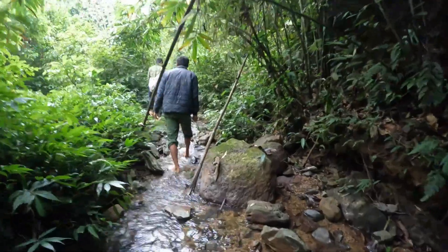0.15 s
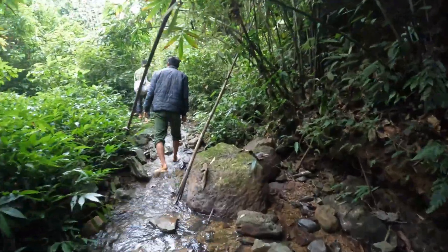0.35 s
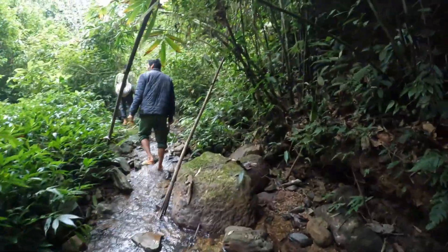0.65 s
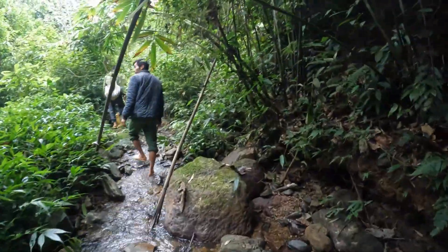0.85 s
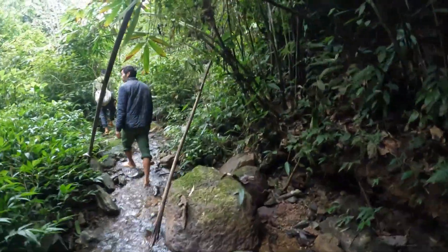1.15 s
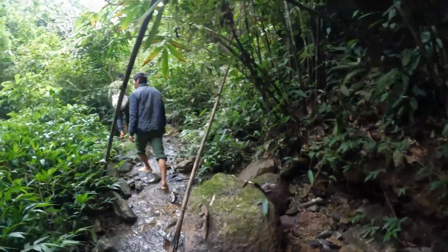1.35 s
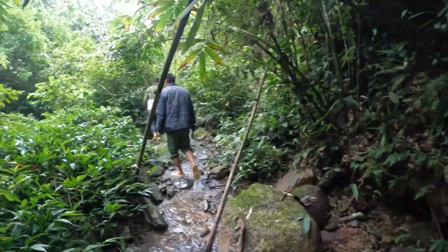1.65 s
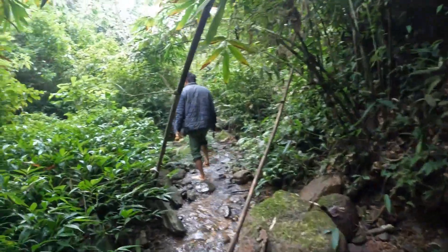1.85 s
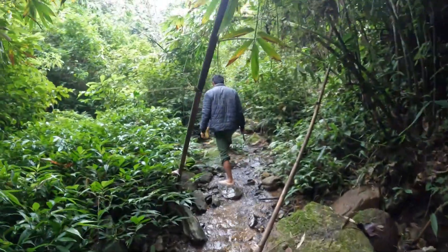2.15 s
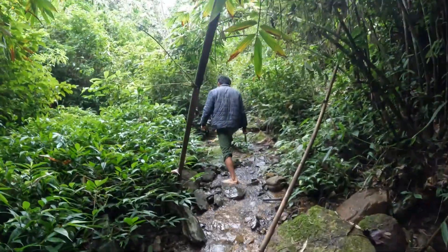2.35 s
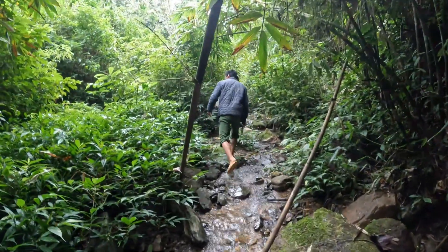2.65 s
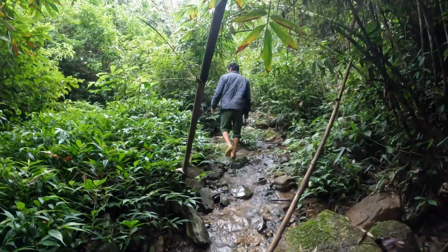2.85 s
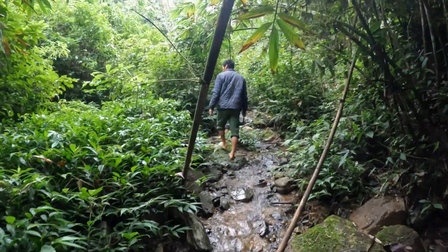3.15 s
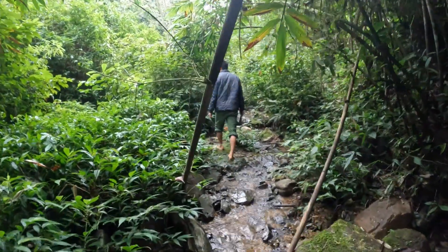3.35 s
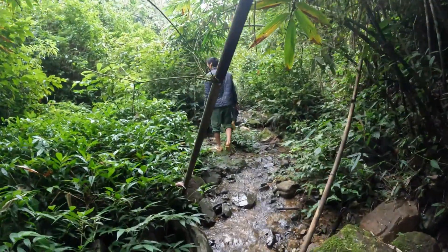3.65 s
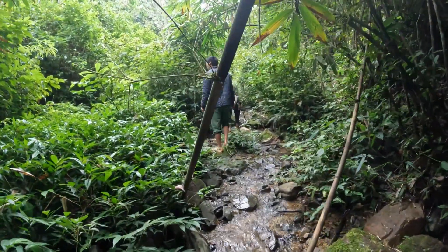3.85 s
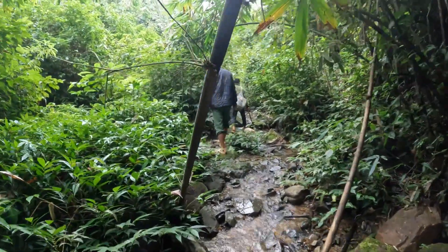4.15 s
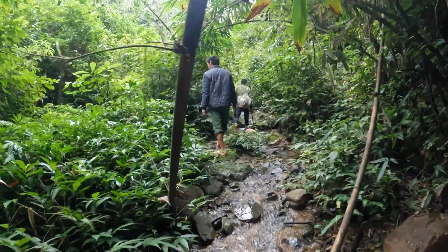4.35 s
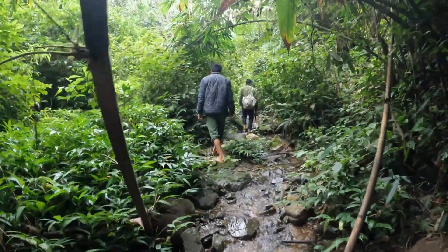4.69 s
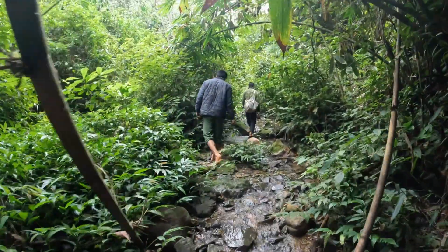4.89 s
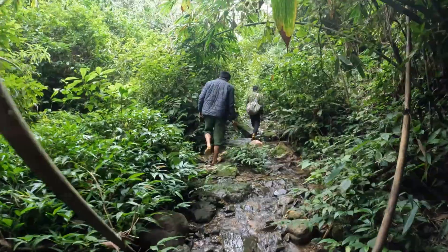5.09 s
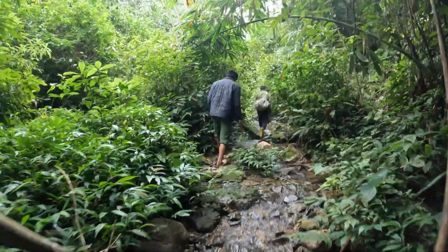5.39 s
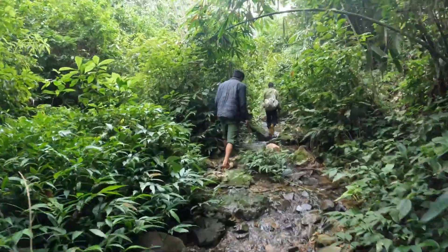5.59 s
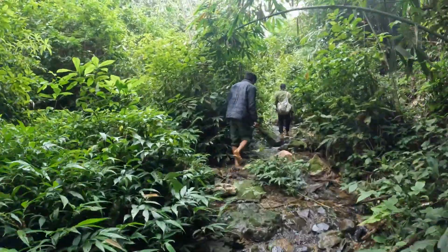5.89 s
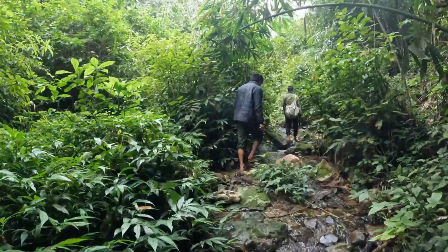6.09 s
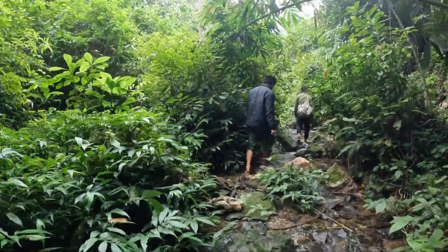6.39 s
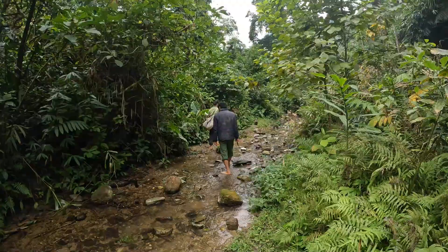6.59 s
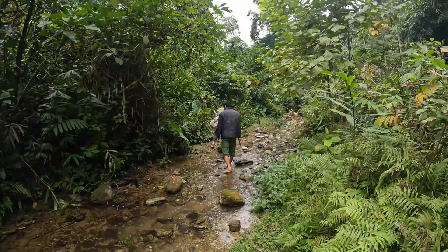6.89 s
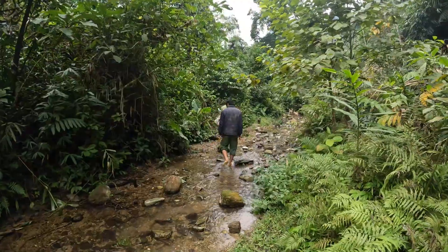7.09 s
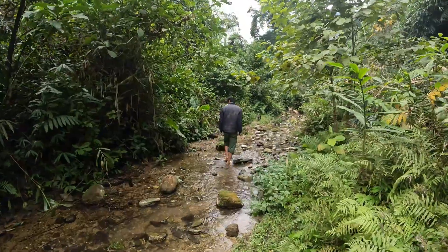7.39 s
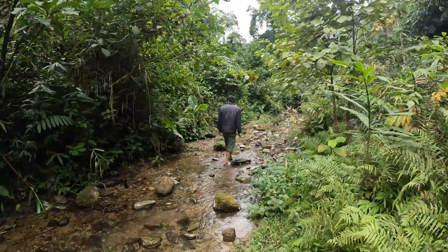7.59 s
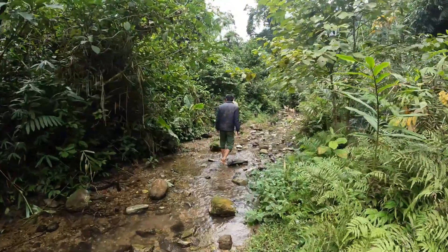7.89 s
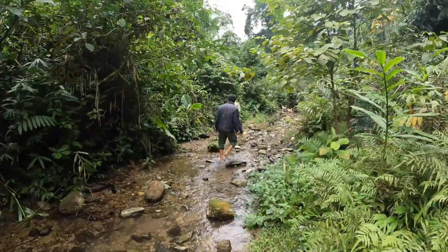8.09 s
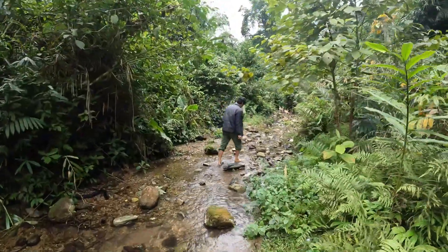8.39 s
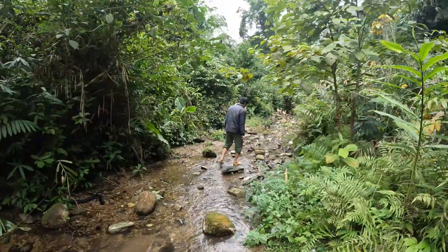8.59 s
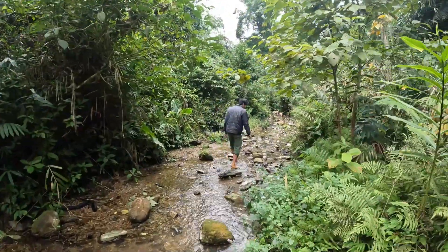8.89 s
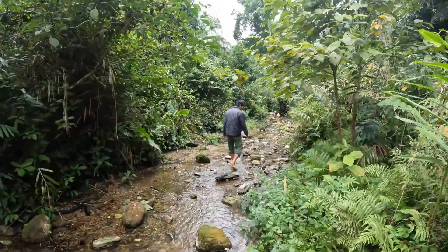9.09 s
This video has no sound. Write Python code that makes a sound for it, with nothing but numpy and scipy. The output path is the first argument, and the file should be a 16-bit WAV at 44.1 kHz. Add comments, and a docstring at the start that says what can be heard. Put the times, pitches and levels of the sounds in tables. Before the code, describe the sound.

A shallow forest stream babbles and gurgles close by from the start, with feet wading through it in irregular splashes. Bubbles plop, and twigs and pebbles give short, sharp snaps, clearest right at the beginning and near 1, 1.9 and 4.3 seconds. The hand-held microphone adds a low, swaying rumble, with dull bumps around 3.5 and 4.5 seconds. Heavier splashes, plops, snaps and jolts cluster at about 5.5 seconds and again near 6.4 seconds. At roughly 6.6 seconds everything cuts off abruptly, and a much quieter, nearly mono stretch of stream quickly fades in. This faint, distant trickle carries a few soft wading splashes and small plops, the most noticeable around 8.4 seconds, and continues until the end just after 9 seconds.

```python
"""A shallow forest stream babbles and sprays round wading feet: small air bubbles resonate over the
broadband rush of turbulence, and each step throws up a splash. Big bubbles plop, twigs and pebbles snap,
and the hand-held camera that follows the walkers rumbles as it sways and jolts. After a hard cut a second,
much quieter and nearly mono stretch of the stream fades in."""
import sys
import numpy as np
from scipy import signal
from scipy.fft import rfft, irfft, next_fast_len
from scipy.io import wavfile
from scipy.ndimage import uniform_filter1d, map_coordinates

SR = 44100
rng = np.random.default_rng(int(sys.argv[2]) if len(sys.argv) > 2 else 0)


def pcm_store(signal):
    """Save signal as 16-bit PCM."""
    levels = np.round(np.clip(np.atleast_2d(signal), -1, 1) * 32767)
    wavfile.write(sys.argv[1], SR, levels.astype(np.int16).T)


N = 407484
CUT_S = 6.564  # the close stretch ends here


def amp(db):
    return 10 ** (np.asarray(db) / 20)

def unit(x):
    return x / np.sqrt(np.mean(x ** 2) + 1e-20)

def along(points, hz):
    """Interpolation of (frequency, value) points on a logarithmic frequency axis."""
    knots_hz, values = np.transpose(points)
    return np.interp(np.log(hz + 1), np.log(knots_hz + 1), values)

def curves(rows):
    """Linear interpolation in time: one value per sample for each column after the first."""
    times, *columns = np.transpose(rows)
    return [np.interp(np.arange(N) / SR, times, column) for column in columns]

def wobble(rate):
    """Random modulation: a smooth curve with `rate` knots a second."""
    return map_coordinates(rng.standard_normal(int(N * rate / SR) + 4), [np.arange(N) * rate / SR])

def filtered(x, response):
    """Zero-phase filtering: the spectrum of x times a function of frequency."""
    size = next_fast_len(N + SR // 4)
    return irfft(rfft(x, size) * response(np.fft.rfftfreq(size, 1 / SR)), size)[..., :N]

def panned(db):
    """Level-difference panning: the two gains that put left db above right."""
    return amp([np.asarray(db) / 2, -np.asarray(db) / 2])

def add_at(out, start_s, sound):
    """Superposition: adds a multichannel sound to out from start_s on."""
    span = out[:, round(start_s * SR):][:, :sound.shape[1]]
    span += sound[:, :span.shape[1]]


def turbulence(patchy_db):
    """Turbulent rush: two independent noises whose gain varies in small patches of time and frequency."""
    spectra = signal.stft(rng.standard_normal((2, N), dtype=np.float32), nperseg=256)[2]
    patches = uniform_filter1d(rng.standard_normal(spectra.shape[1:]), size=4, axis=0)
    patches = uniform_filter1d(patches, size=10, axis=1)
    return unit(signal.istft(spectra * amp(patchy_db * unit(patches)), nperseg=256)[1][:, :N])


def bubbles(count, low_hz, high_hz, cycles, spread_db, samples):
    """Bubble resonance: each small air pocket rings as a damped sine that rises in pitch."""
    when, pitch, life = rng.random((count, 3)).T[:, :, None]
    hz = low_hz * (high_hz / low_hz) ** pitch
    turns = np.arange(samples, dtype=np.float32) / SR * hz.astype(np.float32)
    age = turns / (cycles * (0.25 + 1.2 * life)).astype(np.float32)  # in lifetimes
    strength = hz * amp(spread_db * rng.standard_normal((count, 1)))
    ring = strength * age * np.exp(-5 * age) * np.sin(2 * np.pi * turns * (1 + 0.11 * age))
    positions = (when * N).astype(int) + np.arange(samples)
    return unit(np.bincount(positions.ravel(), ring.ravel(), N + samples)[:N])


def bank_scatter(x, wet_db, t60_s):
    """Scattering by banks and leaves, as mid and side: the response changes as the camera walks on."""
    step, t = SR // 4, np.arange(SR // 4) / SR
    pieces = np.pad(x, (0, -N % step)).reshape(-1, step)
    response = rng.standard_normal((2, len(pieces), step)) * amp(-60 * t / t60_s)
    response *= amp([[[wet_db]], [[0]]]) / np.linalg.norm(response[0], axis=-1).mean()
    response[0, :, 0] += 1  # the direct sound
    wash = np.pad(signal.fftconvolve(pieces[None], response, axes=2), ((0, 0), (0, 0), (0, 1)))
    wash[:, 1:, :step] += wash[:, :-1, step:]  # each piece rings on into the next
    return wash[:, :, :step].reshape(2, -1)[:, :N]


def water_layers():
    """Smaller bubbles resonate higher: three populations give gurgle, babble and spray over one rush."""
    rush = turbulence(patchy_db=3.0)
    gurgle = bubbles(count=900, low_hz=225.6, high_hz=892, cycles=5.6, spread_db=5.0, samples=1500)
    babble = bubbles(count=5500, low_hz=634, high_hz=4975, cycles=10.5, spread_db=4.2, samples=480)
    spray = bubbles(count=8000, low_hz=3880, high_hz=13100, cycles=4.8, spread_db=6.5, samples=64)
    # (low edge [Hz], high edge [Hz], bubble share of the power at clarity 1, bubbles)
    bands = [(105, 520, 0.13, gurgle), (776, 7300, 0.38, babble), (4610, 11900, 0.4, spray)]
    return [(low_hz, high_hz, share, rush, unit(bank_scatter(pops, wet_db=-2.3, t60_s=0.18)))
            for low_hz, high_hz, share, pops in bands]


def stream(layers, splashes, flow, spectrum, width, spray_db, clarity):
    """Incoherent sources add in power: flow plus splashes. Low clarity blends bubbles into the rush."""
    babble_db, gurgle_db = curves(flow)
    levels_db = gurgle_db, babble_db, babble_db + spray_db
    surge = wobble(14)  # ripples swell all layers together
    out = np.zeros((2, N))
    for (low_hz, high_hz, share, rush, pops), db, splash_power in zip(layers, levels_db, splashes):
        water = np.sqrt(1 - share * clarity) * rush + np.sqrt(share * clarity) * pops
        band = lambda hz: 1 / np.sqrt((1 + (low_hz / (hz + 1)) ** 8) * (1 + (hz / high_hz) ** 8))
        colour = lambda hz: amp(along(spectrum, hz) + [0 * hz, along(width, hz)])
        mid, side = filtered(water, lambda hz: band(hz) * colour(hz))
        flow_power = amp(db + 0.29 * surge + 0.56 * wobble(35)) ** 2
        out += np.sqrt(flow_power + splash_power) / np.std(mid) * np.array([mid + side, mid - side])
    return out


# Steady flow close by: (time [s], babble level [dB], gurgle level [dB])
CLOSE_FLOW = [(0.0, -41.5, -51), (0.54, -44, -57), (1.12, -44.5, -53.5), (1.45, -46, -56.5),
              (1.86, -42, -52.5), (2.1, -51, -53), (2.35, -47, -55.5), (2.9, -41.5, -47.5),
              (3.17, -41.5, -60.5), (3.48, -46, -50.5), (3.95, -42, -59), (4.49, -43.5, -49),
              (5.16, -41, -56.5), (5.92, -38.5, -43.5), (6.41, -38, -50), (6.5, -64.5, -58)]
# Its spectral envelope: (frequency [Hz], relative level [dB])
CLOSE_SPECTRUM = [(60, -38), (100, -6), (223, 0), (439, -6.5), (642, 6), (863, 0.5), (1290, 5.5),
                  (2380, -1), (3410, -3.5), (5090, -16.5), (7500, -18), (8300, -25), (12400, -25),
                  (13700, -24.5), (15600, -42.5)]
# Its stereo width: (frequency [Hz], side over mid [dB])
CLOSE_WIDTH = [(100, -11), (300, -12.5), (1000, -9.5), (4000, -6), (8000, -6), (15000, -1.5)]
# Its balance at the microphone ports: (frequency [Hz], left over right [dB])
CLOSE_BALANCE = [(100, -8), (300, 1), (3000, 1), (8000, 2), (15000, 6.5)]

def close_stream(layers, splashes):
    """At short range single bubble resonances stand out, and the level differs between the two ports."""
    water = stream(layers, splashes, CLOSE_FLOW, CLOSE_SPECTRUM, CLOSE_WIDTH, spray_db=-7.5, clarity=0.79)
    return filtered(water, lambda hz: panned(along(CLOSE_BALANCE, hz)))


# Rumble of the swaying camera, one list per stretch: (time [s], level [dB])
SWAY_LEVELS = [
    [(0.0, -47), (0.98, -45.5), (1.08, -32.5), (1.5, -50), (2.15, -37.5), (3.29, -55.5), (3.44, -34),
     (3.93, -44), (4.49, -27.5), (4.92, -46), (5.63, -27.5), (6.26, -38), (6.5, -25)],
    [(6.65, -59), (7.1, -68), (8.26, -69), (8.42, -49), (8.6, -70), (9.24, -69)],
]
# Its spectral envelope in the close and the distant stretch: (frequency [Hz], relative level [dB])
CLOSE_RUMBLE = [(2, -24), (4, 8.5), (16, 0), (30, -14), (60, -30), (120, -46.5), (300, -120)]
DISTANT_RUMBLE = [(2, -36), (5, 9), (30, 2), (60, -6.5), (110, -57), (300, -120)]

def camera_sway(levels, spectrum, side_gain):
    """Slow pressure fluctuations on the ports of the moving camera give a partly coherent rumble."""
    mid, side = filtered(rng.standard_normal((2, N)), lambda hz: amp(along(spectrum, hz)))
    return amp(curves(levels)[0]) * np.array([mid + side_gain * side, mid - side_gain * side]) / np.std(mid)


# Feet throwing water: (time [s], babble level [dB], spray over babble [dB], 60 dB decay time [s])
FOOT_SPLASHES = [(0.001, -32, -5, 0.5), (0.023, -25.5, -11, 0.25), (0.233, -34, -6, 0.36),
                 (0.56, -39.5, -8.5, 1), (0.767, -33.5, 2.5, 0.35), (0.892, -39.5, -2.5, 0.96),
                 (1.232, -35.5, -8, 0.31), (1.665, -34, -15, 0.18), (1.787, -41.5, -6, 1),
                 (1.891, -35, -0.5, 0.29), (2.034, -41.5, 0, 0.49), (2.625, -41.5, 5, 0.26),
                 (2.96, -39, -20, 1), (3.31, -36, 8, 0.05), (3.673, -36, -13, 0.53), (3.874, -37, -10, 0.4),
                 (4.238, -34.5, -3.5, 0.15), (4.297, -28, -1, 0.17), (4.712, -39.5, -10, 0.42),
                 (4.77, -40, -28, 1), (5.119, -35, -19, 0.13), (5.272, -41, -5, 0.4), (5.455, -37, 5, 0.22),
                 (5.522, -21.5, 3, 0.088), (5.56, -24.5, -10, 0.23), (5.62, -35.5, -1.5, 0.65),
                 (5.824, -33, -1, 0.22), (6.014, -38, -9, 0.73), (6.122, -31, -20, 0.11),
                 (6.319, -49, 2.5, 0.36), (6.4, -28.5, -8.5, 0.6), (6.445, -27.5, -1.5, 0.3),
                 (6.479, -27, -11, 0.47), (6.799, -54, -13, 0.59), (6.855, -46.5, -27, 0.42),
                 (6.997, -47, -17, 0.2), (7.475, -57, -2, 0.99), (7.61, -50.5, -0.5, 0.22),
                 (7.83, -58.5, -3, 0.56), (7.949, -50.5, -25, 0.3), (8.097, -59.5, -1.5, 0.6),
                 (8.34, -47, -8, 0.34), (8.37, -40, -11.5, 0.35), (8.681, -49, -28, 0.19),
                 (8.972, -52.5, -1, 0.38), (9.072, -46, -10, 0.36), (9.186, -50, -19, 0.29)]

def wading():
    """Impulsive excitation: each splash adds power to the three water layers, then decays exponentially."""
    power, t = np.zeros((3, N)), np.arange(SR // 2) / SR
    for start_s, db, spray_db, t60_s in FOOT_SPLASHES:
        # distant splashes swell in more slowly, with slightly more gurgle
        gurgle_db, rise_s = (-12.5, 0.0044) if start_s < CUT_S else (-11.5, 0.012)
        envelope = amp(db - 60 * t / t60_s) * (1 - np.exp(-t / rise_s))
        add_at(power, start_s, (amp([[gurgle_db], [0], [spray_db]]) * envelope) ** 2)
    return power


# Large bubbles and drops: (time [s], level [dB], nominal frequency [Hz])
BIG_BUBBLES = [(0.022, -22, 1627), (0.036, -14.5, 1702), (0.044, -21.5, 1946), (0.085, -25, 300),
               (0.091, -21, 1393), (0.25, -22, 857), (0.268, -26, 980), (0.444, -31, 990), (0.56, -27, 910),
               (0.594, -27.5, 942), (0.773, -21.5, 425), (1.323, -26.5, 492), (1.336, -24, 500),
               (1.66, -28, 1500), (1.785, -19, 1464), (1.805, -26, 1365), (1.888, -22, 2094),
               (2.034, -26, 1524), (2.459, -31, 716), (2.521, -30, 1325), (2.965, -29, 414),
               (3.056, -23.5, 1046), (3.088, -30, 560), (3.1, -26.5, 640), (3.185, -31.5, 640),
               (3.697, -25, 1180), (3.895, -28, 3200), (3.907, -25, 1710), (4.268, -29, 650),
               (4.36, -25, 1530), (5.117, -23, 3780), (5.151, -29, 1204), (5.269, -30, 3080),
               (5.522, -19, 2960), (5.525, -22.5, 330), (5.572, -22.5, 380), (5.56, -20.5, 1100),
               (5.71, -23, 975), (5.787, -27, 1088), (5.818, -17, 297), (5.906, -23.5, 290),
               (5.916, -25.5, 1124), (6.306, -25.5, 716), (6.345, -30, 700), (6.375, -28, 720),
               (6.437, -16.5, 195.6), (6.482, -19, 290), (6.491, -18.5, 1074), (6.497, -20, 320),
               (6.515, -18, 718), (6.519, -17, 1137), (7.147, -46, 1224), (7.956, -38, 1130),
               (8.096, -38, 1330), (8.357, -40, 220), (8.39, -34, 1150), (8.555, -44.5, 1256),
               (8.69, -47, 620), (8.794, -40, 2800), (9.07, -40, 2120), (9.185, -39, 2910),
               (9.197, -39, 1210)]

def plops(t60_s=0.049, rise_s=0.0032, close_left_db=2.5):
    """A bubble's resonance climbs as it nears the surface; water bursting round it roughens the ring."""
    out, t = np.zeros((2, N)), np.arange(SR // 6) / SR
    for start_s, db, hz in BIG_BUBBLES:
        phase = 2 * np.pi * hz * t * (0.95 + 0.13 * t / t60_s)
        roughness = 1 + 0.63 * unit(uniform_filter1d(rng.standard_normal(len(t)), 1 + int(2 * SR / hz)))
        envelope = amp(db - 60 * t / t60_s) * (1 - np.exp(-t / rise_s))
        gains = panned(close_left_db * (start_s < CUT_S))[:, None]
        add_at(out, start_s, gains * envelope * roughness * np.sin(phase))
    return out


# Twigs and pebbles: (time [s], peak level [dB], centre frequency [Hz], left over right [dB])
TWIG_SNAPS = [(0.0841, -13.5, 3360, 1.5), (0.0917, -16, 3210, 1.5), (0.153, -22, 3600, 2.0),
              (0.1755, -26, 2840, 1.5), (0.9704, -11.5, 5040, 3.5), (1.0076, -18, 5960, 6),
              (1.0244, -28, 4370, 2.0), (1.064, -23.5, 2880, 5), (1.6015, -27, 2450, 2.0),
              (1.8936, -14.5, 2700, 1), (1.921, -16.5, 2550, 2), (2.9145, -26.5, 3390, -4),
              (3.15, -26, 3250, -1), (3.3117, -25.5, 3030, 4.5), (3.3308, -25.5, 5100, 1.5),
              (4.3021, -14, 3500, 2.0), (4.4518, -25, 2620, -8), (4.7117, -25, 3890, 6),
              (5.4625, -19.5, 2980, 3.5), (5.5273, -13.5, 2850, 7), (5.5635, -20.5, 2470, 8),
              (5.7404, -29, 3260, 5.5), (5.8248, -20, 2540, 4), (5.8536, -24, 3580, 6),
              (6.0496, -24.5, 4630, 6), (6.32, -20.5, 6760, 9), (6.4314, -17, 3330, 5),
              (6.455, -16, 3800, 13.5), (6.553, -21.5, 2840, 8.5), (7.864, -37, 2720, 0.0)]

def snaps(t60_s=0.0064, tail_db=-15.5, tail_t60_s=0.13):
    """Impact excitation: a sharp blow and a noise burst with a faint wet tail drive a broad resonance."""
    out, t = np.zeros((2, N)), np.arange(SR // 10) / SR
    for start_s, db, hz, pan_db in TWIG_SNAPS:
        crack = rng.standard_normal(len(t)) * (amp(-60 * t / t60_s) + amp(tail_db - 60 * t / tail_t60_s))
        crack[0] += 2.5  # the blow
        resonance = signal.butter(2, [hz * 0.75, hz * 1.28], "bandpass", fs=SR, output="sos")
        snap = signal.sosfilt(resonance, crack)
        add_at(out, start_s, panned(pan_db)[:, None] * amp(db) * snap / np.abs(snap).max())
    return out


# Jolts of the hand on the camera body, and at 6.528 s a last low thump just as the scene changes: (time [s],
# level [dB], frequency [Hz], left over right [dB])
HAND_JOLTS = [(0.898, -40, 60, 15), (3.42, -18.5, 22, -2), (3.484, -25.5, 194, -9), (3.547, -17, 19, -2),
              (3.685, -29, 22, -4), (4.288, -25, 49, -4), (4.371, -27, 20, -3), (4.528, -19, 19, -3),
              (4.644, -32, 34, -11), (5.477, -21, 32, 21), (5.558, -19, 40, 11), (5.62, -20, 36, 19),
              (5.877, -26, 30, 17), (6.10, -29.5, 23, 9), (6.255, -24.5, 27, 9.5), (6.528, -23, 9.4, 27)]

def camera_jolts(cycles_per_60_db=4.3):
    """Damped free vibration: each jolt starts a low swing that dies out in a few cycles."""
    out, t = np.zeros((2, N)), np.arange(SR // 2) / SR
    for start_s, db, hz, pan_db in HAND_JOLTS:
        swing = amp(db - 60 * t * hz / cycles_per_60_db) * np.sin(2 * np.pi * hz * t)
        add_at(out, start_s, panned(pan_db)[:, None] * swing)
    return out


# Steady flow further off: (time [s], babble level [dB], gurgle level [dB])
DISTANT_FLOW = [(6.75, -68, -78), (6.96, -59.5, -69.5), (7.29, -66, -68), (7.84, -68.5, -75),
                (8.04, -59, -66.5), (8.84, -63.5, -68), (9.24, -61.5, -74)]
# Its spectral envelope: (frequency [Hz], relative level [dB])
DISTANT_SPECTRUM = [(60, -50), (100, -16), (163, -0.5), (333, -10), (670, -7), (1040, -4), (2100, -2),
                    (3900, -7.5), (4600, -17.5), (5250, -24), (6200, -18), (8000, -20), (11100, -25),
                    (12600, -16), (14000, -19), (15600, -39.5)]
# Its stereo width: (frequency [Hz], side over mid [dB])
DISTANT_WIDTH = [(200, -24), (1500, -56), (8000, -28), (11000, -12), (12500, 1), (15000, 2)]

def distant_stream(layers, splashes):
    """Masking: at a distance the water is faint and single bubbles merge into the rush."""
    return stream(layers, splashes, DISTANT_FLOW, DISTANT_SPECTRUM, DISTANT_WIDTH,
                  spray_db=-8.5, clarity=0.3)


# Gain of the topmost hiss: (time [s], gain [dB])
TREBLE_GAIN = [(0, -2.5), (5.3, -0.5), (5.5, -8.5), (6.5, -2), (6.6, -14), (7.35, -15), (7.5, -3.5)]

def treble_shelf(x, corner_hz=10800):
    """A time-varying high shelf: the topmost hiss dulls and returns."""
    treble = filtered(x, lambda hz: 1 / (1 + (corner_hz / (hz + 1)) ** 12))
    return x + (amp(curves(TREBLE_GAIN)[0]) - 1) * treble


def scene():
    """Superposition of the sources in each stretch, with a hard cut from the close to the distant one."""
    t = np.arange(N) / SR
    layers, splashes, snaps_and_plops = water_layers(), wading(), snaps() + plops()
    close = close_stream(layers, splashes * (t < CUT_S)) + snaps_and_plops + camera_jolts()
    close += camera_sway(SWAY_LEVELS[0], CLOSE_RUMBLE, side_gain=0.39)
    after_cut = t > CUT_S + 0.2
    distant = distant_stream(layers, splashes * after_cut) + snaps_and_plops * after_cut
    distant += camera_sway(SWAY_LEVELS[1], DISTANT_RUMBLE, side_gain=0.046)
    fade_in = np.clip((t - 6.62) / 0.12, 0, 1)
    return treble_shelf(np.where(t < CUT_S, close, distant * fade_in))


def record(dry):
    """Band limiting: the camera passes nothing above its cutoff frequency."""
    return filtered(dry, lambda hz: hz < 15757)


dry = scene()
out = record(dry)
pcm_store(out)
```